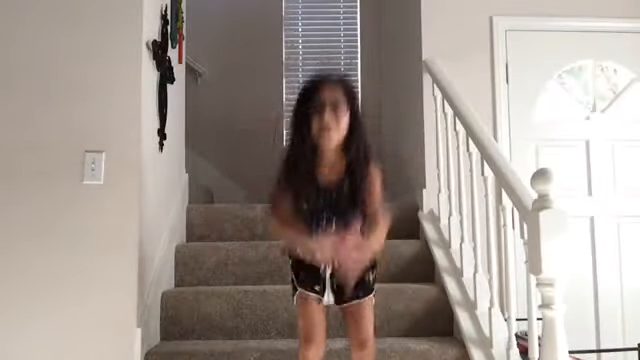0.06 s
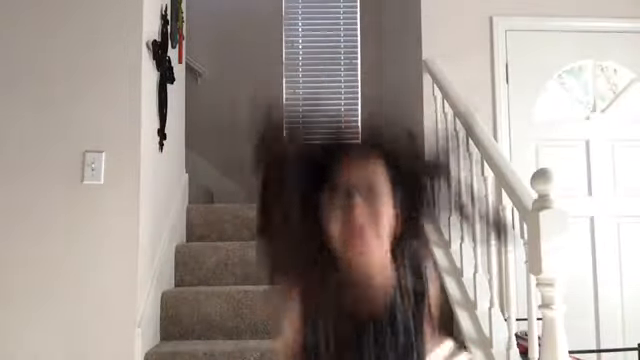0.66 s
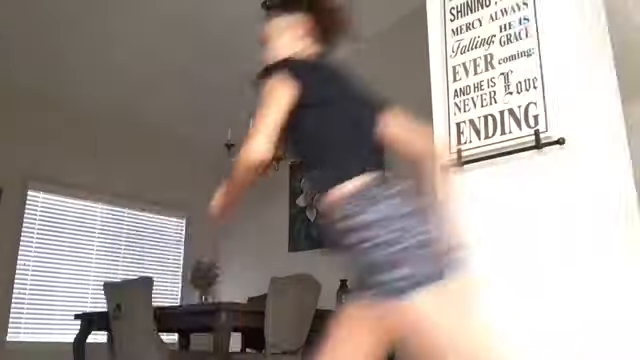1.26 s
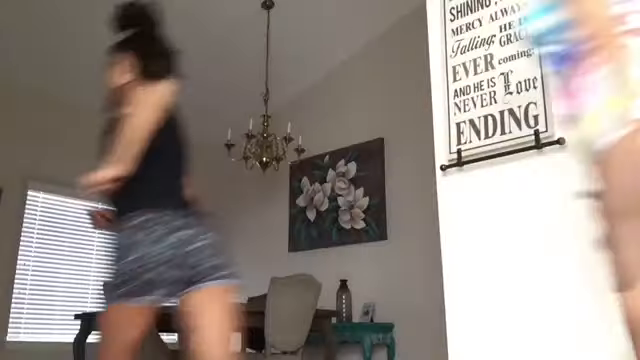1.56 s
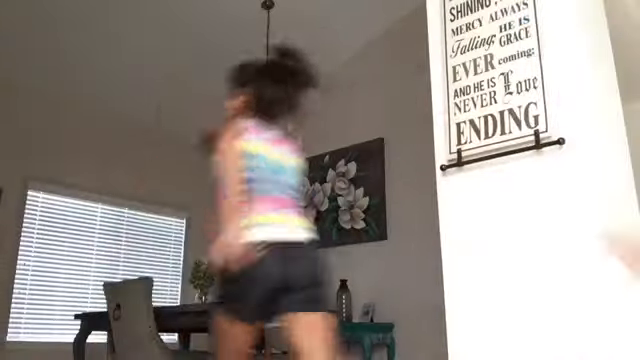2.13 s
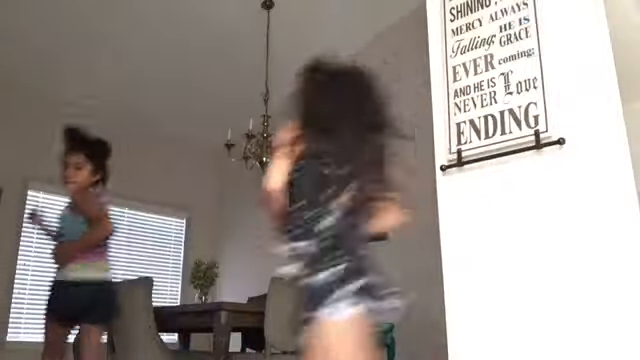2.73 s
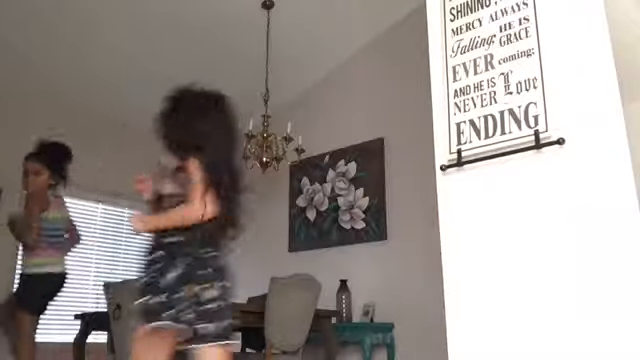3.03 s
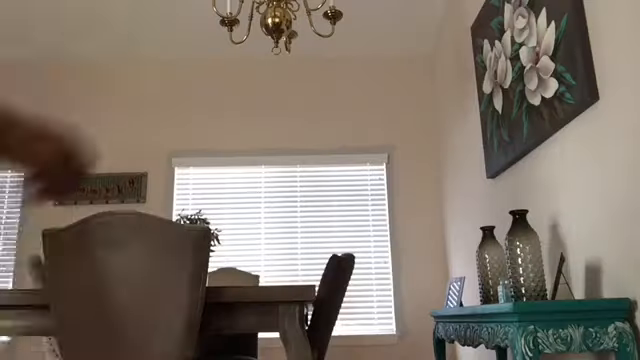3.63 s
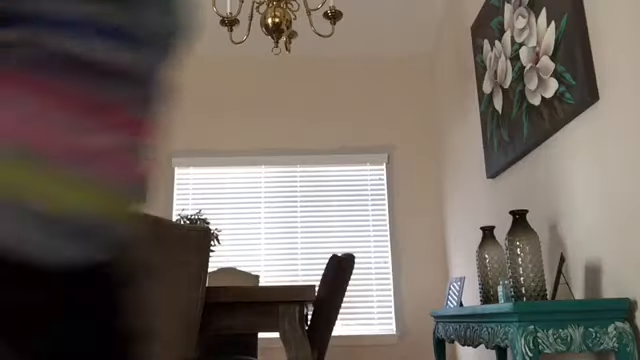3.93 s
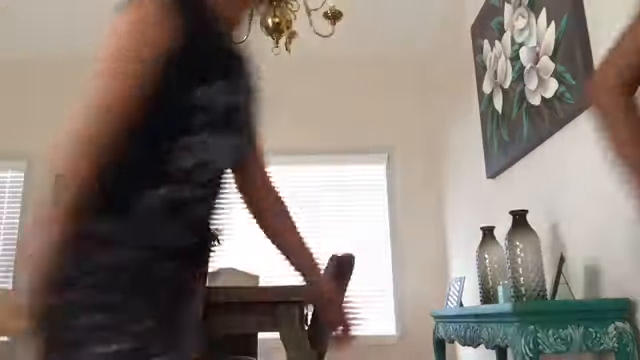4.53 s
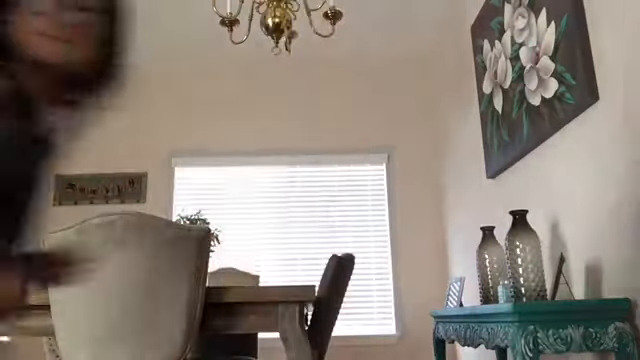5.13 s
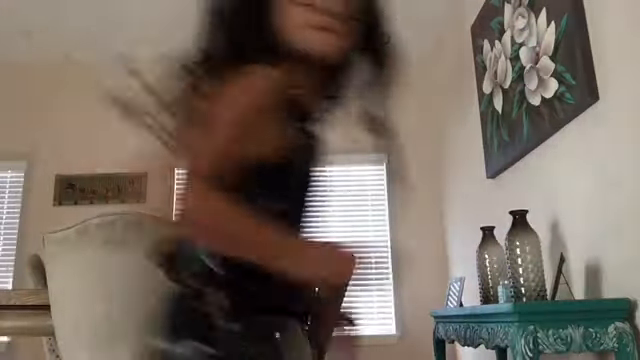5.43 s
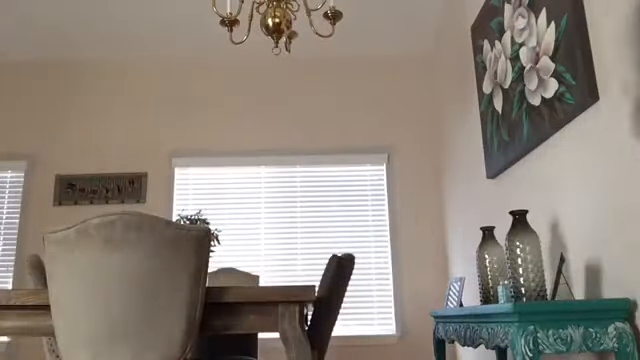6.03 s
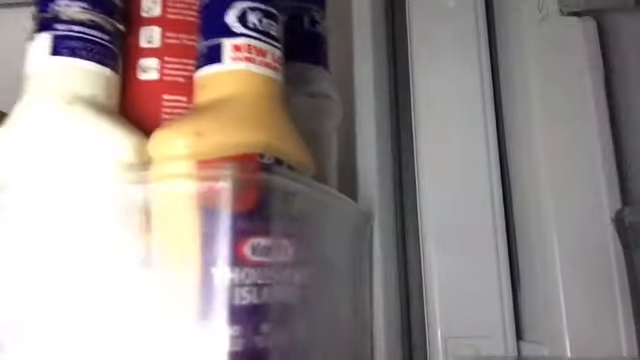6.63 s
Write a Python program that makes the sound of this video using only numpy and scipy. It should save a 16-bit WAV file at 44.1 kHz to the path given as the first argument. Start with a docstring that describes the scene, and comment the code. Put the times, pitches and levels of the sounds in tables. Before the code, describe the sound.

Barefoot dancing in an echoing room: booming heels, light slaps and cloth rustle, then a fridge door bumps open and a bottle clinks.

```python
"""Barefoot dancers on a carpeted house floor in a tall, live room, heard from a phone 0.4 to 2.8 m away. Over
faint rumble and hum a first slap of skin sounds; at 0.7 s a heavy landing booms the floor, then heels make the
floor boom, soles and hands slap, and clothes swish past. Near 1 s the phone or its stand knocks hollowly. The
dancers circle, rustling, then come nearer, and a firm thump sounds at 5.4 s. At the end come close bumps and
rubs as a fridge door opens, and a bottle clinks. The sound drops out briefly at 1.3, 3.7 and 6.4 s."""
import sys
import numpy as np
from scipy import signal
from scipy.fft import rfft, irfft, next_fast_len
from scipy.io import wavfile
from scipy.ndimage import uniform_filter1d, map_coordinates

SR = 44100
rng = np.random.default_rng(int(sys.argv[2]) if len(sys.argv) > 2 else 0)


def master_out(mix):
    """Clip the mix to full scale and print it as 16-bit PCM to the path in sys.argv[1]."""
    frames = np.transpose(np.atleast_2d(mix))
    ceiling = np.clip(frames, -1, 1)
    pcm = np.round(ceiling * 32767).astype(np.int16)
    wavfile.write(sys.argv[1], SR, pcm)


N = 298998

# Spectrum of knocked floorboards. Each row: frequency in Hz, level in dB.
BOARD_SPECTRUM = [(90, -33), (150, -5), (188, -1), (235, -3.5), (280, -9), (325, -12.5), (400, -20.5),
                  (520, -19.5), (800, -23), (2000, -86)]
# Spectrum of sliding cloth. Each row: frequency in Hz, level in dB.
CLOTH_SPECTRUM = [(150, 12), (500, -8.5), (1500, -4), (3000, 1), (5000, 1), (8000, -5.5), (12000, 0.5),
                  (16000, -19)]


def amp(db):
    """Decibels to gain."""
    return 10 ** (np.asarray(db) / 20)


def unit(x):
    """Scale to rms 1."""
    return x / np.sqrt(np.mean(x ** 2) + 1e-20)


def unit_top(x, window_s=0.023):
    """Scale so that the loudest stretch has rms 1."""
    power = uniform_filter1d(x ** 2, int(window_s * SR), mode="constant")
    return x / np.sqrt(power.max() + 1e-20)


def along(points, hz):
    """Read (Hz, value) points on a log frequency axis."""
    knots_hz, values = np.transpose(points)
    return np.interp(np.log(hz + 1), np.log(knots_hz + 1), values)


def noise(spectrum, size):
    """Coloured noise of rms 1."""
    padded = next_fast_len(size + 8192)
    gain = amp(along(spectrum, np.fft.rfftfreq(padded, 1 / SR)))
    return unit(irfft(rfft(rng.standard_normal(padded)) * gain, padded)[:size])


def burst(envelope, evenness=0.18):
    """A noise burst of energy 1, its spectrum slightly evened out."""
    spectrum = rfft(rng.standard_normal(len(envelope)) * envelope)
    x = irfft(spectrum / (np.abs(spectrum) + 1e-9) ** evenness, len(envelope))
    return x / np.linalg.norm(x)


def coloured(x, spectrum, size=4096):
    """Causal filter: nothing sounds before the blow."""
    gain = amp(along(spectrum, np.fft.rfftfreq(size, 1 / SR)))
    cepstrum = irfft(np.log(gain))
    cepstrum[1:size // 2] *= 2
    cepstrum[size // 2 + 1:] = 0
    return signal.fftconvolve(x, irfft(np.exp(rfft(cepstrum))))[:len(x)]


def wobble(rate, size):
    """A smooth random curve with rate knots a second."""
    knots = rng.standard_normal(int(size * rate / SR) + 4)
    return map_coordinates(knots, [np.arange(size) * rate / SR])


def add(track, start_s, sound):
    """Mix a sound into the track."""
    start = max(round(start_s * SR), 0)
    stretch = track[start:start + len(sound)]
    stretch += sound[:len(stretch)]


def distance(at_s):
    """Metres from the dancers to the microphone."""
    # The dancers' path. Each row: time in seconds, distance in metres.
    path = [(0.15, 1.07), (0.74, 2.3), (1.0, 0.42), (1.42, 2.16), (2.0, 2.26), (2.9, 2.8), (3.5, 2.08),
            (4.45, 2.2), (4.85, 1.37), (6.1, 1.15)]
    return np.interp(at_s, *np.transpose(path))


def room_air(level_db=-68, hum_db=-77, hum_hz=119):
    """Low house rumble, a wavering appliance hum and microphone hiss."""
    # Rumble and hiss. Each row: frequency in Hz, level in dB.
    air_spectrum = [(26, -45), (45, -8), (63, -1), (123, 0.5), (192, -8), (411, -14), (453, -21),
                    (513, -18.5), (656, -21), (1340, -23.5), (2080, -25), (2600, -27.5), (13500, -29),
                    (16000, -38.5)]
    t = np.arange(N) / SR
    hum_gain = amp(hum_db + 3 * wobble(30, N))
    hum = hum_gain * np.sin(2 * np.pi * hum_hz * t + 0.51 * wobble(8.5, N))
    return hum + amp(level_db) * noise(air_spectrum, N)


def room_tail(early_db=5, early_s=0.01):
    """Room echo of energy 1: strong near walls, then a tail whose treble dies first."""
    # The room's decay. Each row: frequency in Hz, seconds to fall 60 dB.
    room_t60 = [(100, 0.66), (400, 0.72), (1500, 0.89), (4000, 0.57), (9000, 0.43), (15000, 0.24)]
    hz, frame_s, bands = signal.stft(rng.standard_normal(SR), SR, nperseg=256)
    decay = amp(-60 * frame_s / along(room_t60, hz)[:, None])
    tail = signal.istft(bands * decay, SR, nperseg=256)[1][:SR]
    t = np.arange(SR) / SR
    onset = 1 - np.exp(-t / 0.002)
    tail *= onset * amp(early_db * np.exp(-t / early_s) + 1.24 * wobble(255, SR))
    return tail / np.linalg.norm(tail)


def small_ticks(from_s=0.95, level_db=-47, spread_db=4, wet_db=2, count=30):
    """Toes, hems and hair tick faintly at random once the dance is under way."""
    blows = np.zeros(N)
    for when, strength in rng.random((count, 2)):
        add(blows, from_s + when * (N / SR - from_s), amp([level_db + spread_db * (2 * strength - 1)]))
    direct = coloured(blows, CLOTH_SPECTRUM)
    return direct + amp(wet_db) * signal.fftconvolve(direct, room_tail())[:N]


def friction(strokes, surface, grain_db, grain_rate, swell_share=0.37):
    """Sliding contacts catch and let go as they swell and fade, each with its share of bright hiss."""
    # The bright hiss of sliding. Each row: frequency in Hz, level in dB.
    sheen_spectrum = [(2000, -30.5), (5000, -10), (8500, -1.5), (12000, -1.5), (14000, -0.5),
                      (16000, -29.5)]
    t, dull, bright = np.arange(N) / SR, np.zeros(N), np.zeros(N)
    for peak_s, db, length_s, sheen_db in strokes:
        rise_s, fall_s = swell_share * length_s, (1 - swell_share) * length_s
        speed = np.exp(-(np.minimum(t - peak_s, 0) / rise_s) ** 2 / 2 - np.maximum(t - peak_s, 0) / fall_s)
        power = (amp(db) * speed) ** 2 / (1 + amp(sheen_db) ** 2)
        dull += power
        bright += power * amp(sheen_db) ** 2
    catches = unit(amp(grain_db * wobble(grain_rate, N) + 2.14 * wobble(60, N)))
    return catches * (np.sqrt(dull) * noise(surface, N) + np.sqrt(bright) * noise(sheen_spectrum, N))


def rustles(start_s=1.63, end_s=3.096, level_db=-71, spread_db=6.5, length_s=0.2, sheen_db=-6, count=7):
    """Faint strokes of cloth at loosely even times while the dancers circle the room."""
    slot_s = (end_s - start_s) / count
    return [(start_s + (k + late) * slot_s, level_db + spread_db * (2 * strength - 1), length_s, sheen_db)
            for k, (late, strength) in enumerate(rng.random((count, 2)))]


def clothes(level_db=-1, wet_db=-4, patchy_db=3.5):
    """Dresses and shorts swish as the dancers turn; shifting folds keep changing the colour."""
    # Strokes of cloth. Each row: peak time in seconds, relative level in dB, length in seconds,
    # sheen in dB against the cloth.
    swishes = [(0.715, -62, 0.084, 14), (0.91, -62, 0.045, -10), (1.07, -67.5, 0.14, 3.5),
               (1.342, -44.5, 0.017, 6.5), (1.45, -68, 0.15, -1), (2.495, -62.5, 0.04, 2),
               (3.11, -63.5, 0.13, -3), (3.55, -57, 0.067, -8), (4.468, -56, 0.063, 3),
               (4.72, -60, 0.086, -6), (4.821, -54, 0.023, 7), (5.145, -54, 0.041, 11),
               (5.18, -49.5, 0.051, 8.5), (5.533, -51.5, 0.026, 2.5), (6.008, -60.5, 0.03, 16),
               (6.08, -64, 0.016, -1), (6.165, -65.5, 0.033, 5)]
    sliding = friction(swishes + rustles(), CLOTH_SPECTRUM, grain_db=2, grain_rate=550)
    bands = signal.stft(sliding, nperseg=512)[2]
    folds = uniform_filter1d(rng.standard_normal(bands.shape), size=4, axis=0)
    folds = unit(uniform_filter1d(folds, size=10, axis=1))
    direct = amp(level_db) * signal.istft(bands * amp(patchy_db * folds), nperseg=512)[1][:N]
    return direct + amp(wet_db) * signal.fftconvolve(direct, room_tail())[:N]


def fridge_door(ring_db=-1, thud_db=-7, decay_s=0.013, thud_life=2.03, sheen_db=-3):
    """Close bumps and rubs, with no room echo, as a fridge door opens; a bottle clinks."""
    # Bumps and, at 6.69 s, the clink. Each row: start in seconds, relative level in dB, pitch in Hz.
    bumps = [(6.401, -48.5, 109), (6.553, -41.5, 141), (6.584, -43, 128), (6.63, -33.5, 54.7),
             (6.652, -31.5, 190), (6.654, -39, 334), (6.659, -30.5, 65.6), (6.691, -50, 1194),
             (6.703, -40, 124), (6.747, -42, 278), (6.76, -40, 138)]
    # Short rubs. Each row: peak time in seconds, level in dB, length in seconds.
    rubs = [(6.399, -59.5, 0.01), (6.441, -61.5, 0.008), (6.539, -65.5, 0.014), (6.612, -45, 0.014),
            (6.634, -49, 0.017), (6.67, -55, 0.021), (6.695, -45.5, 0.015), (6.744, -59.5, 0.01)]
    # Spectra of a thud and of a rub. Each row: frequency in Hz, level in dB.
    thud_spectrum = [(30, 4), (90, 9.5), (230, -2), (350, 1), (500, -24), (900, -22), (2000, -26),
                     (5000, -67)]
    rub_spectrum = [(100, 8.5), (380, 3), (700, 7), (950, -2), (1300, 3.5), (1700, -2), (2400, -1),
                    (4500, -4), (8000, -17), (16000, -46)]
    knocks, t = np.zeros(N), np.arange(SR // 4) / SR
    onset = 1 - np.exp(-t / 0.00049)
    for start_s, db, hz in bumps:
        ring = amp(ring_db) * np.sin(2 * np.pi * hz * t) * np.exp(-t / decay_s)
        thud = amp(thud_db) * noise(thud_spectrum, len(t)) * np.exp(-t / (decay_s * thud_life))
        add(knocks, start_s, amp(db) * (ring + thud) * onset)
    return knocks + friction([(*rub, sheen_db) for rub in rubs], rub_spectrum, grain_db=1, grain_rate=750)


def slaps(crack_s=0.0022, brush_s=0.0093, brush_db=-10, width_octaves=0.28, room_radius_m=1.6):
    """Each contact brushes, then lands in a short crack coloured by a resonance; the hard walls answer."""
    # Skin slaps, plus three hollow knocks near 1 s from the phone or its stand.
    # Each row: time in seconds, relative level in dB, pitch of the resonance in Hz, its boost in dB.
    contacts = [(0.159, -34, 5150, 15), (0.698, -22, 3700, 8), (0.722, -19, 2290, 0),
                (0.960, -31.5, 2500, 5.5), (0.992, -29, 584, 10.5), (1.002, -26, 580, 4),
                (1.083, -39.5, 606, 11), (1.314, -26.5, 6020, -0.5), (1.337, -27.5, 3170, 1),
                (1.4211, -26.5, 11000, 11), (1.577, -23, 3000, 1.5), (1.664, -34.5, 1720, 6),
                (1.871, -31, 4100, 7.5), (1.942, -23, 1710, 6.5), (2.139, -26, 4230, 5.5),
                (2.252, -22.5, 5500, -4), (2.360, -30, 5800, 7), (2.552, -34.5, 4000, 4.5),
                (2.837, -27, 704, 9.5), (2.858, -28.5, 910, 5), (3.170, -26.5, 1850, 10.5),
                (3.505, -21.5, 2440, 5), (3.904, -41.5, 1880, 12), (4.323, -33.5, 3380, 11.5),
                (4.441, -20.5, 2280, 3), (4.842, -21.5, 2800, 3), (5.099, -29.5, 1510, 4),
                (5.404, -24.5, 765, 2), (5.531, -35, 5300, 13.5)]
    # A slap of skin. Each row: frequency in Hz, level in dB.
    skin_spectrum = [(100, -39), (300, 7.5), (500, 0), (14000, -2), (16000, -11.5)]
    out, lead = np.zeros(N), SR // 25
    t = np.arange(-lead, SR // 2) / SR
    hz = np.geomspace(50, SR / 2, 120)
    for at_s, db, resonance_hz, boost_db in contacts:
        crack = burst(np.exp(-abs(t) / crack_s) * (t >= 0))
        brush = amp(brush_db) * burst(np.exp(-abs(t) / brush_s))
        echo = np.pad(room_tail(), (lead, 0))[:len(t)]
        wet = distance(at_s) / room_radius_m  # far slaps trade direct sound for room
        heard = (crack + brush + wet * echo) / np.sqrt(1 + 0.69 * wet ** 2)
        hump_db = boost_db * np.exp(-(np.log2(hz / resonance_hz) / width_octaves) ** 2 / 2)
        # a small patch of skin traps little air: it is both higher and brighter than a whole sole
        db_per_octave = 2 * np.log2(resonance_hz / 3420)
        tilt_db = db_per_octave * np.log2(np.maximum(hz, 500) / 3000)
        colour = np.transpose([hz, along(skin_spectrum, hz) + tilt_db + hump_db])
        add(out, at_s + t[0], amp(db) * coloured(heard, colour))
    return out


def boards(t, t60, count=12):
    """Upper floor modes: every spot has its own few pitches, and the high ones die first."""
    spot, strength = rng.random((2, count))
    hz = 140 * 3.5 ** ((np.arange(count) + spot) / count)
    gain = amp(along(BOARD_SPECTRUM, hz)) * (0.5 + strength) * rng.choice([-1, 1], size=count)
    decay = amp(-60 * np.outer(np.sqrt(hz / hz.min()), t) / t60)
    return gain @ (np.sin(2 * np.pi * np.outer(hz, t)) * decay)


def floor_ring(t, t60, spot_hz, falloff_db_per_octave=27.5):
    """Deep floor modes: a step in mid-span favours the lowest, a stiffer spot a higher one."""
    # Floor resonances. Each row: frequency in Hz, relative level in dB, ring time as a multiple of t60.
    modes = [(76.95, -3.5, 1.43), (105, -4.5, 0.99), (135.3, -4, 0.48), (174.6, -5, 0.6)]
    ring = np.zeros(len(t))
    for hz, db, life in modes:
        favour = amp(-falloff_db_per_octave * abs(np.log2(hz / spot_hz)))
        # every spot rings at slightly different strengths and pitches
        envelope = amp(db + rng.normal(0, 1) - 60 * t / (t60 * life))
        pitch_hz = hz * (1 + rng.normal(0, 0.029))
        ring -= favour * envelope * np.sin(2 * np.pi * pitch_hz * t)
    return ring


def footfalls(boom_db=-3, knock_db=-4, scatter_db=-9, blur_db=-6, tail_db=-21, tail_t60=0.98):
    """Each heel rings the floor's deep modes and, when hard, its boards; the room smears both."""
    # Heels landing. Each row: start in seconds, relative level in dB, extra gain of the knock in dB,
    # pitch that the spot favours in Hz.
    steps = [(0.7, -29, -5, 136), (0.743, -27.5, -13.5, 112), (0.992, -43, -8, 105), (1.333, -50, 5.5, 165),
             (1.362, -39.5, -10.5, 100.6), (1.666, -52.5, 0.5, 168), (1.941, -49.5, 2, 88.5),
             (2.252, -46, -4.5, 92.3), (2.52, -43, -16, 88.6), (2.647, -51, -2.5, 78), (2.836, -45, 1, 127),
             (2.875, -41, -9, 170), (3.171, -43.5, -3.5, 91), (3.349, -51, 0, 86), (3.504, -52, -0.5, 91),
             (4.305, -49, -12, 89), (4.434, -51.5, -6.5, 90), (4.698, -55, -2.5, 82.5),
             (4.826, -52.5, -2, 174), (4.843, -44.5, -17, 77), (5.106, -45.5, -13, 101.5),
             (5.411, -31, -19.5, 97), (5.763, -47.5, -12.5, 95), (6.106, -40.5, -11.5, 102)]
    # The floor's boom. Each row: frequency in Hz, level in dB.
    boom_spectrum = [(25, -12), (50, -18), (75, -3.5), (105, 5.5), (150, -3), (190, -19.5), (280, -38),
                     (600, -62)]
    out, t = np.zeros(N), np.arange(SR) / SR
    carpet_onset = 1 - np.exp(-t / 0.0011)  # carpet softens the start of the blow
    for start_s, db, hard_db, spot_hz in steps:
        boom_t60 = 0.2 * distance(start_s) ** 1.16  # far steps cross more floor and ring longer
        knock_t60 = 1.76 * boom_t60
        ring = unit_top(floor_ring(t, boom_t60, spot_hz))
        smear_decay = amp(scatter_db - 60 * t / boom_t60) + amp(tail_db - 60 * t / tail_t60)
        boom = unit_top(ring + noise(boom_spectrum, SR) * smear_decay)
        blur = noise(BOARD_SPECTRUM, SR) * amp(blur_db - 60 * t / knock_t60)
        knock = unit_top(unit_top(boards(t, knock_t60)) + blur)
        blow = amp(boom_db) * boom + amp(hard_db + knock_db) * knock
        add(out, start_s, amp(db) * carpet_onset * blow)
    # the footfalls carry little below 60 Hz
    return signal.sosfilt(signal.butter(4, 60, "highpass", fs=SR, output="sos"), out)


def scene():
    """All sources at the one microphone."""
    return (footfalls() + slaps() + clothes() + small_ticks() + fridge_door() + room_air())[None]


def record(dry):
    """The sound drops out briefly three times; nothing passes above 16.1 kHz."""
    # Dropouts. Each row: start in seconds, end in seconds, gain in dB.
    dropouts = [(1.272, 1.310, -50), (3.700, 3.728, -14), (6.388, 6.400, -35)]
    t, gain = np.arange(N) / SR, np.ones(N)
    for start_s, end_s, db in dropouts:
        gain[(t > start_s) & (t < end_s)] = amp(db)
    padded = next_fast_len(N + 8192)
    spectrum = rfft(dry * uniform_filter1d(gain, size=96), padded)
    passband = np.fft.rfftfreq(padded, 1 / SR) < 16100
    return irfft(spectrum * passband, padded)[..., :N]


dry = scene()
out = record(dry)
master_out(out)
```